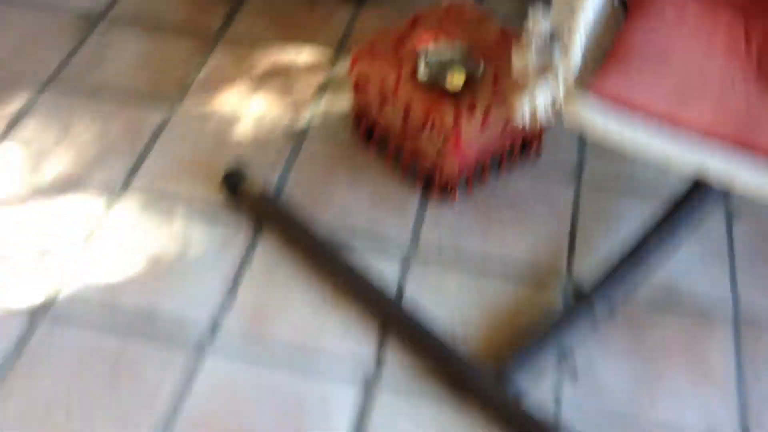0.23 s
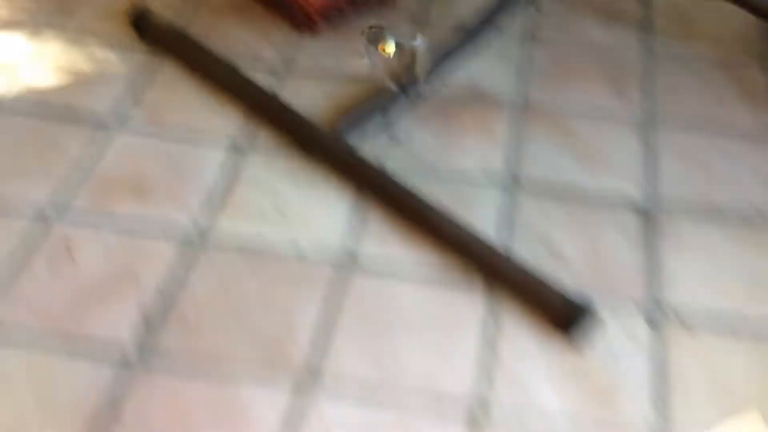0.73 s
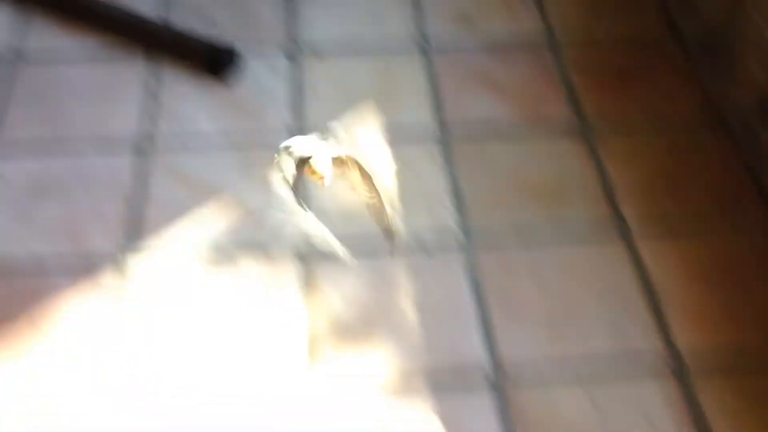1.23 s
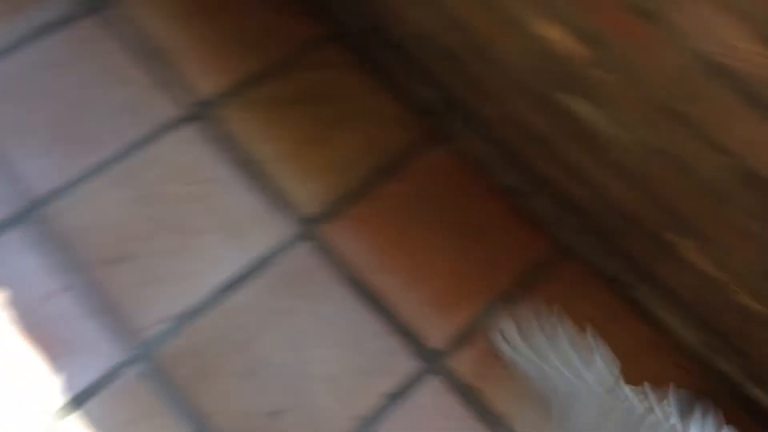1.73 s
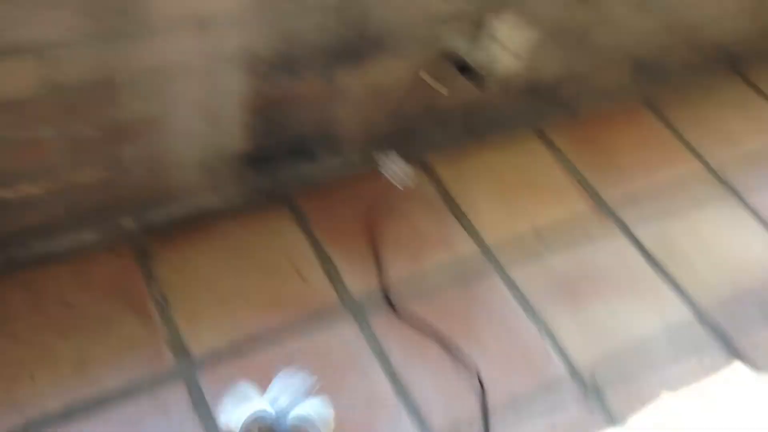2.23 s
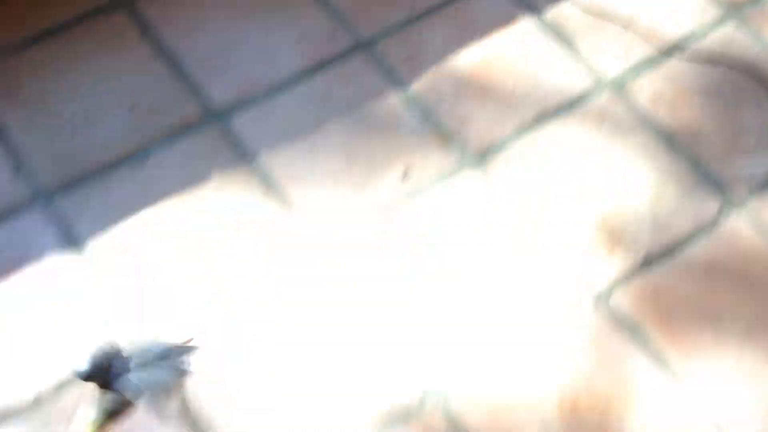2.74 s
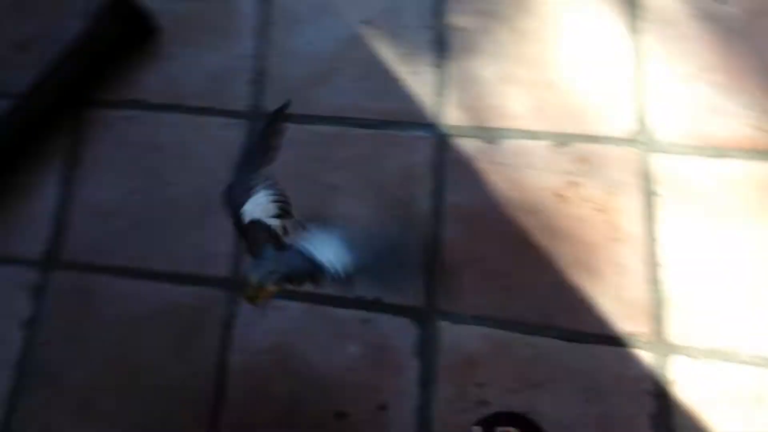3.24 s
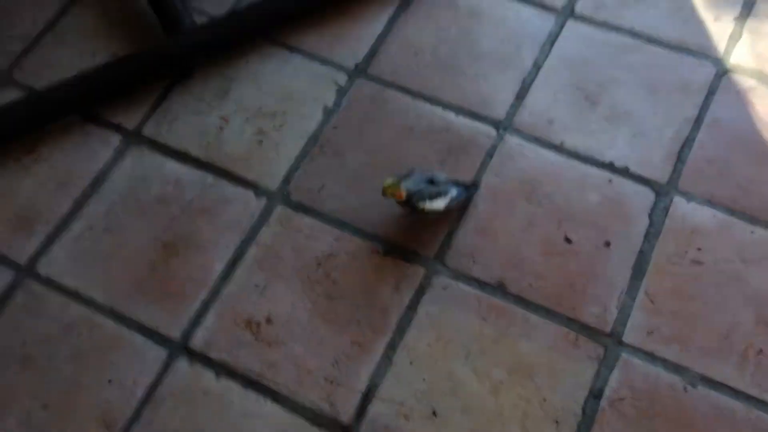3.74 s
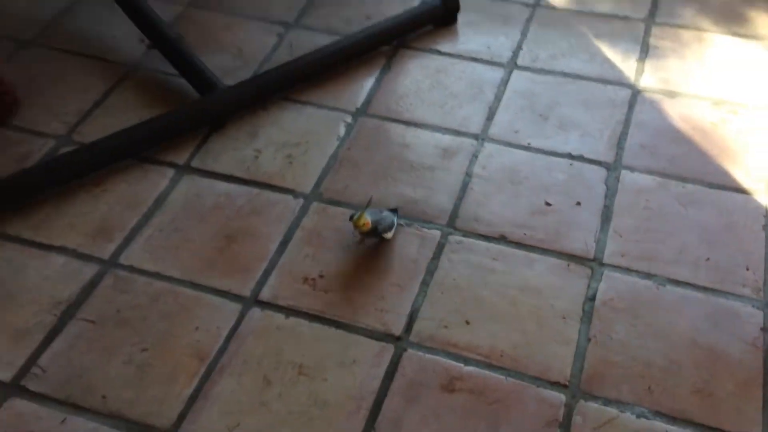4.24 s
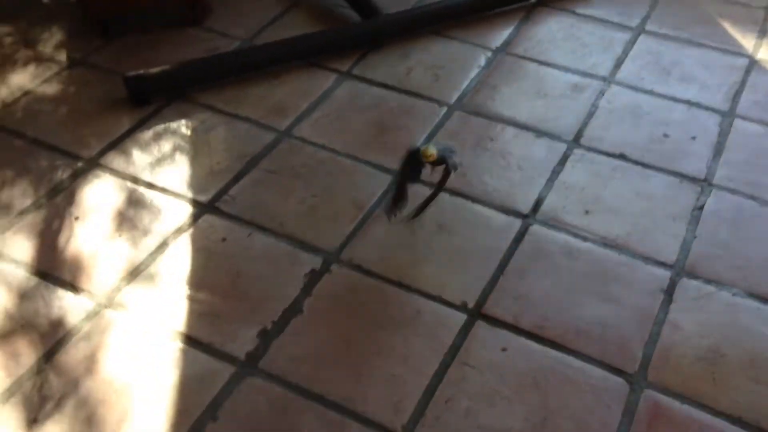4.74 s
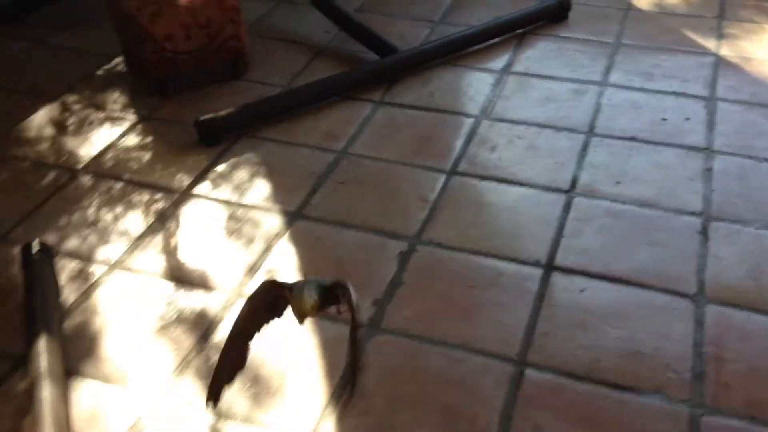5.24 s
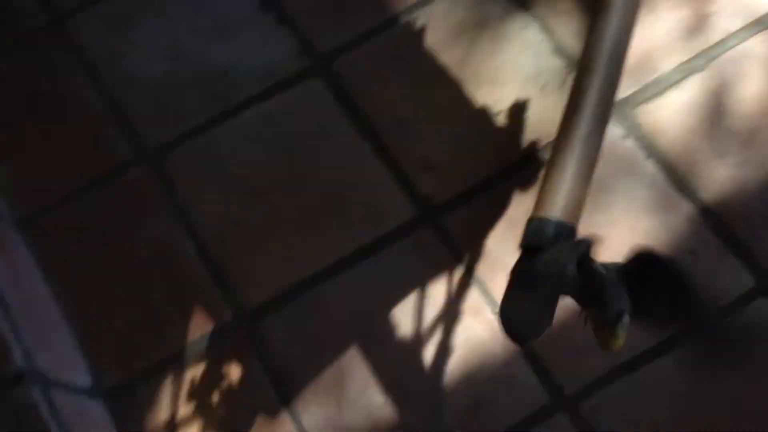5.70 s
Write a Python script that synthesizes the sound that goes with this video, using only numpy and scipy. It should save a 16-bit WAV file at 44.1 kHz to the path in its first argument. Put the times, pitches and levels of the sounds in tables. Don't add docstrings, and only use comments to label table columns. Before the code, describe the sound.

A pet cockatiel gives two short raspy whistles and flutters over an echoing tiled porch while sandals scuff, drag and slap loudly.

```python
import sys
import numpy as np
from scipy import signal
from scipy.fft import rfft, irfft, next_fast_len
from scipy.io import wavfile

SR = 44100
rng = np.random.default_rng(int(sys.argv[2]) if len(sys.argv) > 2 else 0)


def dump(signal):
    limited = np.clip(np.atleast_2d(signal).T, -1, 1)
    pcm = np.round(limited * 32767).astype(np.int16)
    wavfile.write(sys.argv[1], SR, pcm)


def ratio(d):
    e = np.asarray(d, float) / 20
    return 10 ** e


N = 263277
TIME = np.arange(N) / SR
COARSE_TIME = TIME[::40]

# (frequency [Hz], level per Hz [dB])
TRAFFIC_SPECTRUM = [(25, -8), (113, 6), (173, -6), (340, 5.5), (500, -18.5), (1800, -9), (3630, -13.5),
                    (15000, -24.5)]
# (frequency [Hz], width [Hz], level [dB])
HUM_TONES = [(63.2, 5.8, -67.5), (120.7, 2.6, -63.5), (547.5, 4, -67.5), (659.5, 5.7, -73.5)]
# (time [s], pitch [Hz], level [dB])
VEHICLE = [
    (3.8, 197, -84),
    (4.0, 200, -58.5),
    (4.4, 210.3, -58.5),
    (4.75, 218, -62),
    (5.0, 222, -74),
]
# (time [s], pitch [Hz], level [dB])
FAN = [(0, 339, -67), (2.0, 339, -67), (2.07, 339, -82), (2.22, 339, -82), (2.28, 339, -67),
       (3.8, 345, -68), (4.0, 345, -64), (5.4, 335, -65), (5.97, 335, -69)]

# (time [s], level [dB])
AIR_STIR = [(0, -54), (.6, -56.5), (.68, -50.5), (1.13, -57), (1.5, -56), (1.95, -52.5), (2.06, -53.5),
            (2.11, -63), (2.21, -59), (2.28, -48.5), (2.42, -55.5), (2.58, -48), (3.15, -59), (3.32, -49.5),
            (3.56, -58), (3.8, -56.5), (4.5, -63), (5.97, -55.5)]
# (loudest time [s], level [dB], rise and fall [s])
GUST_MOVES = [(.01, -56, 0.28), (.31, -62, 0.054), (.5, -64, 0.13), (.65, -55.5, 0.18), (1.14, -57.5, 0.11),
              (1.4, -57.5, 0.28), (1.57, -55, 0.041), (1.9, -52, 0.16), (2.27, -63, 0.069),
              (2.55, -50.5, 0.26), (2.9, -57, .2), (3.32, -55, 0.13), (3.556, -60, .06),
              (3.647, -53.5, 0.045), (4.0, -58.5, 0.49), (4.3, -50.5, 0.13), (4.65, -62, .2),
              (5.1, -63, 0.26), (5.34, -63, 0.13), (5.75, -50, 0.096), (5.93, -61, 0.065)]

# (loudest time [s], level [dB], rise [s], fall [s], brightness [dB per layer])
SOLE_DRAGS = [(.02, -54.5, 0.071, 0.058, 3), (.235, -55, 0.097, 0.054, 0.5), (.385, -58.5, 0.18, 0.052, 0),
              (.675, -59.5, 0.049, 0.24, -2.5), (.89, -54, 0.16, 0.18, 3), (1.26, -61, 0.029, 0.23, -5.5),
              (1.5, -55, 0.28, .12, -.7), (2.075, -58.5, 0.18, 0.071, 0.7), (2.163, -58.5, 0.02, 0.08, 3),
              (2.19, -58, .08, .035, 3.5), (2.275, -57.5, 0.055, 0.12, 0.3), (2.56, -50.5, 0.14, 0.16, 1.5),
              (2.925, -55, 0.14, .14, 3), (3.098, -49.5, 0.046, 0.088, 1.5), (3.33, -54.5, 0.079, 0.17, -1),
              (4.02, -52.5, .18, 0.082, 1.2), (4.31, -52.5, 0.061, 0.12, -1.5),
              (5.255, -55, 0.044, 0.063, -0.8), (5.303, -48, 0.031, 0.023, -7.5),
              (5.36, -53.5, 0.21, 0.24, -1)]
# (loudest time [s], level [dB], fall [s], brightness [dB per layer])
FEATHER_BRUSHES = [(.112, -59.5, 0.086, -1.2), (.575, -66, 0.036, 1), (1.18, -62, 0.09, 0),
                   (1.6, -61.5, 0.03, 4), (1.721, -58.5, 0.094, 1.3), (1.843, -54.5, 0.072, -2.5),
                   (1.93, -54, 0.046, -1), (2.03, -57.5, .03, -3), (2.678, -54.5, 0.024, -5),
                   (2.77, -60, .03, 3.5), (2.865, -59.5, 0.02, 4), (3.21, -61, 0.08, 2.5),
                   (3.737, -59.5, .02, 2), (3.78, -59, 0.062, 2.5), (3.846, -61, .04, -3),
                   (4.09, -61, 0.05, -4), (4.8, -69, 0.043, -4), (4.919, -67.5, .04, -6.5),
                   (5.145, -61, .07, -2.5), (5.52, -70, .05, 5), (5.633, -71, 0.029, 9),
                   (5.74, -55, 0.054, .4), (5.846, -62, 0.095, -0.2), (5.918, -63.5, 0.018, 6)]
# (frequency [Hz], level per Hz [dB])
HEEL_SPECTRUM = [(400, -22), (700, -7.5), (1100, 0), (1600, 2.5), (2500, -23)]
SOLE_SPECTRUM = [(1000, -28), (1600, -3), (2200, -2.5), (2800, -4.5), (3800, -7), (6000, -32)]
GRIT_SPECTRUM = [(2200, -21), (3400, -0.5), (5000, 1), (7500, -3.5), (10000, -18), (14000, -16)]
FEATHER_SPECTRUM = [(5000, -28), (8000, -1.5), (10000, -2.5), (13000, -11), (15500, -2)]
# (heel [dB], sole [dB], grit [dB], feather hiss [dB])
LAYER_LEVELS = (-4.0, 3, 4.0, 2.0)

# (time [s], peak level [dB], pitch [Hz])
CLAW_CLICKS = [(0.105, -50, 1620), (1.697, -39, 2570), (1.7402, -33, 2500), (1.819, -40, 1490),
               (1.879, -43, 2080), (1.9253, -30, 3480), (1.979, -34, 520), (2.0305, -50, 2060),
               (2.1582, -35, 2170), (2.2585, -36, 3150), (2.474, -31, 2070), (2.8619, -40, 3730),
               (3.058, -44, 2430), (3.0952, -29, 2340), (3.6529, -42, 1740), (3.7292, -55, 3620),
               (3.7948, -26, 2520), (4.9137, -50, 1660), (5.24, -34, 4900), (5.729, -37, 3680),
               (5.917, -48, 1840),
               (1.366, -41, 2970), (1.581, -45, 1750),
               (2.316, -42, 1050), (2.417, -44, 2250), (2.466, -40, 2060)]

# (time [s], pitch [Hz], level [dB], octave level [dB], rasp [0-1])
FIRST_CALL_NOTES = [
    [(.108, 1644, -56, -10, 0.6), (.135, 1684, -49, -9, 0.37), (.155, 1774, -37.5, -3.5, 0.1),
     (.175, 1690, -35.5, 5.5, 0.09), (.197, 1590, -45, 4, 0.7), (.212, 1670, -44.5, 3, .8),
     (.225, 1770, -44.5, 4.5, 0.75), (.26, 1850, -46, 7, .75), (.278, 1877, -49, 8.5, .6)],
    [(.28, 1780, -45, -21, 0.82), (.29, 1790, -40, -12, .8), (.304, 1880, -40, -8, 0.7),
     (.316, 1970, -36.5, -9, 0.55), (.328, 2010, -37, -9, .55), (.336, 2000, -40, -9, 0.4),
     (.342, 1980, -58, -12, .6)],
    [(.195, 1575, -46, 2, 0.75), (.25, 1630, -46.5, -1, 0.8), (.3, 1690, -48, 0, .9),
     (.34, 1801, -48, -1, 1)],
]
SECOND_CALL_NOTES = [
    [(4.082, 2170, -55, -20, 0.62), (4.099, 2174, -38.5, -16, .1), (4.113, 1843, -32, -7, 0.32),
     (4.136, 1870, -30, -13, 0.18), (4.146, 1882, -45, 4, 0.24), (4.19, 1870, -44.5, -2, 0.36),
     (4.225, 1860, -43, -8, 0.6), (4.252, 1834, -36, -21, .92), (4.3, 1800, -40.5, -1, 1)],
    [(4.192, 1680, -60, -5, .4), (4.202, 1635, -57, 7, .6), (4.225, 1660, -53, 2, .4),
     (4.25, 1690, -50, -2, .4), (4.275, 1640, -51, -2, .5), (4.295, 1630, -56, -6, .6)],
    [(4.04, 1497, -62, -15, 0.24), (4.05, 1545, -53, -19, .8), (4.075, 1500, -54, -17, .3)],
]
# (multiple of pitch [ratio], level [dB])
UPPER_PARTIALS = [(3, 2.5), (4, -14), (6, -12), (7, -5.5), (8, -13)]

# (time [s], peak level [dB], pitch [Hz], length [s])
WING_PUFFS = [(0.641, -41.5, 327, 0.0098), (0.655, -39, 270, 0.027), (0.727, -45.5, 364, 0.021),
              (1.058, -46, 110, 0.016), (1.134, -46, 129, 0.021), (1.252, -46, 276, 0.019),
              (1.797, -39.5, 125, 0.018), (1.836, -40, 116, 0.016), (1.877, -41, 414, 0.011),
              (1.9, -43, 119, 0.019), (1.945, -39.5, 177, 0.013), (1.975, -34, 194, 0.011),
              (2.212, -45, 530, 0.018), (2.265, -45.5, 336, 0.021), (2.324, -45.5, 367, 0.015),
              (2.464, -42.5, 213, 0.021), (2.531, -39, 400, 0.0092), (2.572, -33.5, 340, 0.015),
              (2.67, -28.5, 341, 0.018), (2.768, -36, 405, 0.01), (4.258, -43, 322, 0.015),
              (4.261, -46, 700, .004), (4.275, -43, 650, 0.004), (3.336, -36, 370, .02),
              (3.36, -39, 350, .025), (1.345, -49, 560, .03), (1.385, -48, 570, .03),
              (2.135, -49, 560, .025), (1.766, -48, 400, .012), (2.045, -46, 350, .02),
              (2.285, -45, 300, .012), (2.305, -47, 330, .012), (2.42, -48, 370, .015),
              (2.487, -42, 370, .012), (2.5, -41, 260, .014), (2.59, -43, 450, .01),
              (2.613, -42, 270, .012), (2.675, -38, 520, .008), (2.71, -44, 300, .012),
              (2.755, -43, 230, .015), (2.79, -46, 430, .012), (2.824, -47, 404, .012),
              (2.932, -49, 183, .015), (5.739, -38.5, 270, 0.012), (5.897, -49, 243, 0.011)]
# (time [s], peak level [dB], air pocket [Hz], heel clack [dB], crack [dB])
SOLE_SLAPS = [
    (0.646, -33, 945, -6.5, -16),
    (0.976, -49, 735, 10.5, -16),
    (1.248, -35.5, 950, 1.5, -10),
    (1.845, -42, 680, 4, -12),
    (2.547, -25, 990, -8, -21),
    (3.33, -13.5, 800, -8, -10),
    (3.795, -37.5, 1040, -7, -5),
    (4.2993, -2.8, 1297, -10.5, -12.5),
]
# (time [s], peak level [dB], pitch [Hz], length [s])
SLAP_ECHOES = [(3.335, -30, 1500, .003), (3.3385, -24, 850, .007), (3.345, -25, 1520, .006),
               (3.351, -25, 750, .006), (3.3555, -24, 880, .005), (3.362, -29, 1700, .005),
               (3.377, -30, 900, .006), (3.389, -30, 850, .005), (3.3935, -30, 780, .006),
               (3.415, -36, 1600, .008), (4.3045, -18, 1800, .007), (4.3135, -15, 1700, .006),
               (4.319, -18, 1400, .004), (4.3225, -19, 950, .005), (4.3265, -20, 1150, .005),
               (4.3315, -14, 1720, .006), (4.335, -16, 1250, .004), (4.343, -21, 980, .004),
               (4.349, -22, 1050, .005), (4.354, -18, 1550, .004), (4.364, -23, 1080, .005),
               (4.373, -25, 1550, .006), (4.385, -23, 1300, .005), (4.395, -25, 1250, .005),
               (4.416, -27, 1500, .005)]
# (loudest time [s], level [dB],
# pitch [Hz], rise [s], fall [s])
RUBBER_CATCHES = [(.98, -55, 1840, .01, 0.061), (1.52, -53.5, 1970, .12, .07),
                  (2.17, -55, 2350, 0.013, 0.049), (3.097, -43.5, 2240, 0.043, 0.037),
                  (3.35, -39.5, 1640, 0.018, 0.16), (4.085, -49, 2400, 0.14, 0.11),
                  (4.272, -56, 4950, .02, .04), (5.302, -44.5, 1920, 0.018, 0.028),
                  (5.385, -48, 2380, 0.033, 0.036), (5.47, -58, 1710, 0.046, 0.041)]
# (time [s], start pitch [Hz], end pitch [Hz], length [s], peak level [dB])
WILD_CHIRP = (4.5095, 6000., 8250., .0055, -31.)
# (frequency [Hz], time to fall 60 dB [s], level [dB])
PORCH_ECHO = [(200, 0.78, 2.5), (530, 0.65, -3), (1020, 0.84, -1.5), (1600, 0.66, 3.5), (2080, 0.63, 5.5),
              (4030, 0.64, 3), (8100, 0.41, 6), (13800, 0.64, 1.5)]


def rms_one(x):
    return x / np.sqrt(np.mean(x ** 2) + 1e-20)


def in_time(rows):
    times, *columns = np.transpose(rows)
    return [np.interp(TIME, times, column) for column in columns]


def at_hz(points, hz, column=1):
    points = np.array(points)
    return np.interp(np.log(hz), np.log(points[:, 0]), points[:, column])


def band(x, low_hz, high_hz):
    edges = [low_hz, min(high_hz, 0.45 * SR)]
    return signal.sosfilt(signal.butter(2, edges, "band", fs=SR, output="sos"), x)


def noise():
    return rng.standard_normal(N)


def drift(rate_hz):
    r = np.exp(-2 * np.pi * rate_hz * 40 / SR)
    slow = signal.lfilter([1], [1, -2 * r, r * r], rng.standard_normal(N // 40 + 2002))[2000:]
    return np.interp(np.arange(N) / 40, np.arange(len(slow)), rms_one(slow))


def coloured(x, spectrum):
    size = next_fast_len(N)
    hz = np.maximum(np.fft.rfftfreq(size, 1 / SR), 1)
    shaped = rfft(x, size) * ratio(at_hz(spectrum, hz))
    return rms_one(irfft(shaped, size)[:N])


def resonance(x, hz, width_hz):
    r = np.exp(-np.pi * width_hz / SR)
    ringing = [1, -2 * r * np.cos(2 * np.pi * hz / SR), r * r]
    return signal.lfilter([(1 - r * r) / 2, 0, (r * r - 1) / 2], ringing, x)


def narrow(x, hz, width_hz):
    return resonance(resonance(x, hz, width_hz), hz, width_hz)


def swell(s, db, rise, fall):
    before = (s - COARSE_TIME) / max(rise, 0.004)
    after = (COARSE_TIME - s) / max(fall, 0.004)
    return ratio(2 * (db - 15 * np.maximum(before, after)))


def gain(power):
    return np.interp(TIME, COARSE_TIME, np.sqrt(power))


def pulse(hz, cycles):
    turns = np.arange(400) / SR * hz
    bell = np.exp(-((turns - 1.05) / (0.71 * cycles)) ** 2)
    return -np.sin(2 * np.pi * turns) * bell * np.minimum(2 * turns, 1)


def background():
    traffic = ratio(-60) * coloured(noise(), TRAFFIC_SPECTRUM)

    vehicle_hz, vehicle_db = in_time(VEHICLE)
    vehicle = ratio(vehicle_db + 0.82 * drift(4.5)) * np.sin(2 * np.pi * np.cumsum(vehicle_hz) / SR)

    fan_hz, fan_db = in_time(FAN)
    sway = narrow(rng.standard_normal((2, N)), 20.0, width_hz=31.0)
    turn = 2 * np.pi * np.cumsum(fan_hz) / SR
    fan = ratio(fan_db) * rms_one(sway[0] * np.sin(turn) + sway[1] * np.cos(turn))

    white = noise()
    hum = sum(ratio(db) * rms_one(narrow(white, hz, width_hz)) for hz, width_hz, db in HUM_TONES)
    return traffic + vehicle + fan + ratio(2.5 * drift(3.0) - 0.7) * hum


def stirred_air():
    resting_power = ratio(2 * -72.0)
    gusts = gain(resting_power + sum(swell(s, db, length, length) for s, db, length in GUST_MOVES))
    rumble = rms_one(band(noise(), 28.0, 206.0)) * gusts * ratio(1.0 + 3.2 * drift(14.0))
    stir_db, = in_time(AIR_STIR)
    flutter = rms_one(band(noise(), 195.0, 722.0)) * ratio(stir_db - 3.0 + 1.97 * drift(27.0))
    return rumble + flutter


def grains(per_s, spread_db, smooth):
    sizes = ratio(spread_db * np.minimum(rng.exponential(1, N), 4)) * rng.choice([-1, 1], N)
    slips = rms_one(sizes * (rng.random(N) < per_s / SR))
    return slips + smooth * noise()


def dragging():
    brushes = [(s, db, 0.51 * fall, fall, bright) for s, db, fall, bright in FEATHER_BRUSHES]
    moves = SOLE_DRAGS + brushes
    layer_step = np.arange(4)[:, None] - 1.5
    tilt = ratio(2 * layer_step * np.array([move[4] for move in moves]))
    resting_power = ratio(2 * -80.5)
    power = resting_power + tilt @ np.array([swell(*move[:4]) for move in moves])
    heel, sole, grit, hiss = [gain(layer) * ratio(db) for layer, db in zip(power, LAYER_LEVELS)]

    burst_db = 1.54 * drift(21.3) + 0.96 * drift(63.0)
    heel = heel * coloured(grains(1500.0, 3.7, 0.54), HEEL_SPECTRUM) * ratio(burst_db + 2.1 * drift(25.0))
    sole = sole * coloured(grains(2500.0, 2.6, 0.77), SOLE_SPECTRUM) * ratio(burst_db + 0.79 * drift(46.0))
    grit = grit * coloured(grains(6000.0, 2.8, 0.71), GRIT_SPECTRUM) * ratio(burst_db)
    hiss = hiss * coloured(grains(9000.0, 2.2, 1.1), FEATHER_SPECTRUM) * ratio(0.78 * burst_db)
    return heel + sole + grit + hiss


def claw_clicks():
    out = np.zeros(N)
    for s, peak_db, hz in CLAW_CLICKS:
        at = round(s * SR)
        out[at:at + 400] += ratio(peak_db - 6.0) * pulse(hz, cycles=2.0)
    return out


def cockatiel():
    out = np.zeros(N)
    waver = drift(90.0) + 1.6 * drift(260.0)
    rasp_hz = 85.8 * (1 + 0.12 * drift(33.0))
    throb = np.cos(2 * np.pi * np.cumsum(rasp_hz) / SR)
    for call in (FIRST_CALL_NOTES, SECOND_CALL_NOTES):
        for number, note in enumerate(call):
            hz, level_db, octave_db, rasp = in_time(note)
            rasp = np.clip(rasp, 0, 1)
            turn = 2 * np.pi * np.cumsum(hz * (1 + rasp * 0.016 * waver)) / SR

            upper = np.zeros(N)
            for multiple, db in UPPER_PARTIALS:
                if number > 0 and int(multiple) == 3:
                    db = db - 14.0
                upper += ratio(db) * np.sin(int(multiple) * turn)
            upper_db = -20.0 + 0.81 * octave_db - 7 * rasp
            voice = np.sin(turn) + ratio(octave_db) * np.sin(2 * turn) + ratio(upper_db) * upper

            to_edge_s = np.minimum(TIME - note[0][0], note[-1][0] - TIME)
            sounding = np.clip(to_edge_s / 0.0057, 0, 1)
            out += np.sqrt(2) * ratio(level_db) * sounding * voice * (1 + rasp * throb)
    return out


def puffs(rows):
    out = np.zeros(N)
    for s, peak_db, hz, length in rows:
        t = np.arange(round(length * SR) + 2) / SR
        at = round(s * SR)
        bell = np.sin(np.pi * t / t[-1]) ** 1.7
        out[at:at + len(t)] += ratio(peak_db) * bell * np.sin(2 * np.pi * hz * t)
    return out


def slaps():
    out = np.zeros(N)
    for s, peak_db, pocket_hz, clack_db, crack_db in SOLE_SLAPS:
        at = round((s + 0.0007) * SR)
        pocket = pulse(pocket_hz, cycles=0.98)
        clack = ratio(clack_db) * pulse(1650.0, cycles=0.94)
        crack = ratio(crack_db) * pulse(3650, cycles=0.75)
        out[at:at + 400] += ratio(peak_db) * (pocket + clack + crack)
    return signal.sosfilt(signal.butter(4, 7000.0, fs=SR, output="sos"), out)


def catches():
    white = noise()
    out = np.zeros(N)
    for s, db, hz, rise, fall in RUBBER_CATCHES:
        out += gain(swell(s, db, rise, fall)) * rms_one(narrow(white, hz, width_hz=0.18 * hz))
    return out


def wild_bird():
    s, from_hz, to_hz, length, peak_db = WILD_CHIRP
    part = np.clip((TIME - s) / length, 0, 1)
    hz = from_hz + (to_hz - from_hz) * np.sin(np.pi / 2 * part)
    return ratio(peak_db) * np.sin(np.pi * part ** 0.9) * np.sin(2 * np.pi * np.cumsum(hz) / SR)


def porch(x, early_s, late_db, build_s):
    t = TIME[:SR]
    tail = np.zeros(SR)
    edges = 100 * 2 ** np.arange(0, 7.6, 0.5)
    for low, high in zip(edges, edges[1:]):
        hz = np.sqrt(low * high)
        fading_db = at_hz(PORCH_ECHO, hz, column=2) - 60 * t / at_hz(PORCH_ECHO, hz)
        tail += band(rng.standard_normal(SR), low, high) * ratio(fading_db)
    separate = ratio(3.05 * drift(136.0)[:SR] * np.exp(-t / 0.059))
    build = 1 - np.exp(-(t / build_s) ** 2)
    early_and_late = np.exp(-(t / early_s) ** 2) + ratio(late_db)
    tail = tail * separate * build * early_and_late
    return signal.fftconvolve(x, tail / np.sqrt(np.sum(tail ** 2)))[:N]


def scene():
    rub, claws, calls = dragging(), claw_clicks(), cockatiel()
    thumps, sole, chirp = puffs(WING_PUFFS), slaps(), wild_bird()
    echoed = ratio(1.2) * sole + ratio(-3.0) * chirp
    echoed += ratio(-13.0) * rub + ratio(-19.0) * thumps + ratio(-9.0) * claws
    room = porch(echoed, early_s=0.11, late_db=6.0, build_s=0.007)
    near_walls = ratio(-6.0) * porch(calls, early_s=0.016, late_db=-15.0, build_s=0.0058)
    direct = rub + claws + calls + thumps + sole + catches() + chirp
    echoes = ratio(-2.0) * puffs(SLAP_ECHOES) + room + near_walls
    mix = background() + stirred_air() + direct + echoes
    return mix[None]


def roll_off(x):
    return signal.sosfilt(signal.butter(12, 15400, fs=SR, output="sos"), x)


def record(dry):
    x = signal.sosfilt(signal.butter(2, 43.0, "high", fs=SR, output="sos"), dry)
    x = signal.sosfilt(signal.cheby2(12, 70, 16000, fs=SR, output="sos"), x)
    return roll_off(x)


dry = scene()
out = record(dry)
dump(out)
```